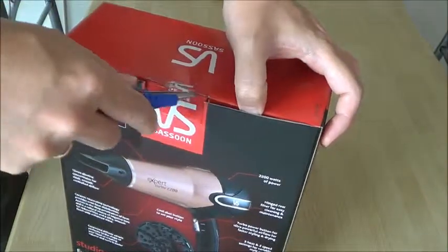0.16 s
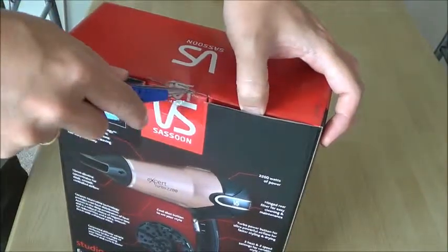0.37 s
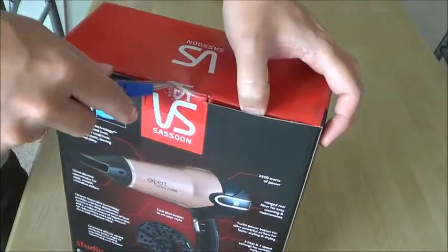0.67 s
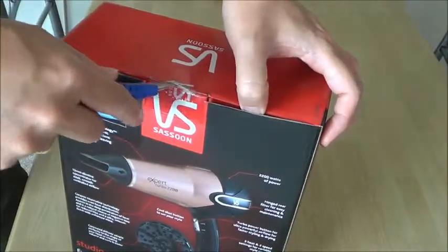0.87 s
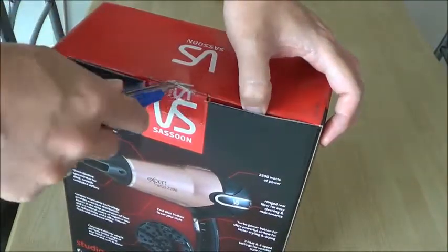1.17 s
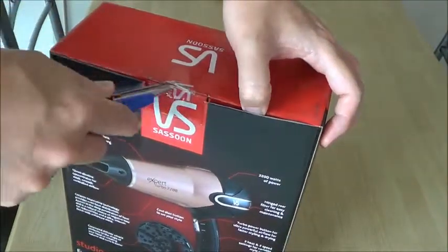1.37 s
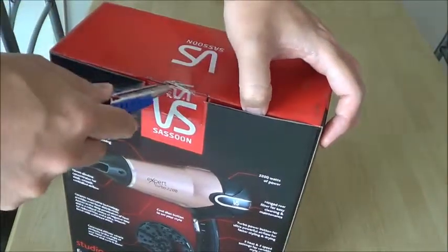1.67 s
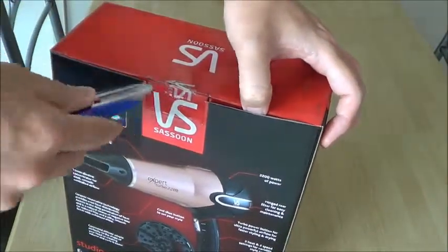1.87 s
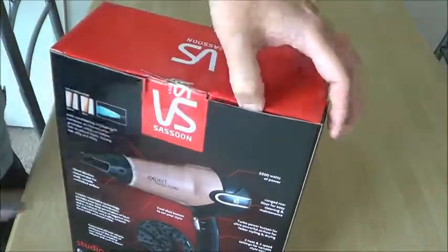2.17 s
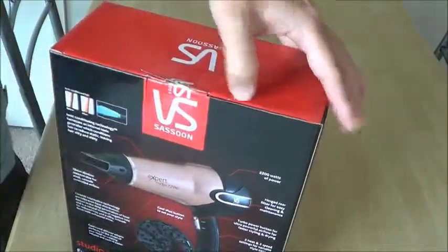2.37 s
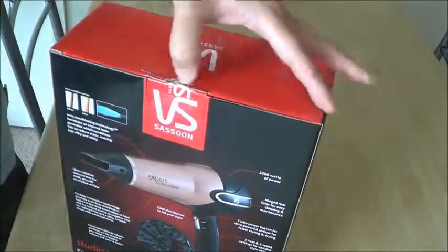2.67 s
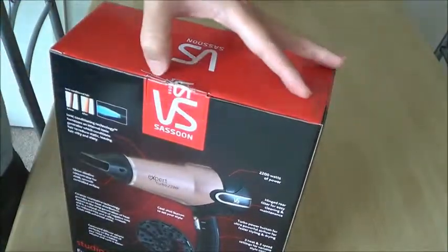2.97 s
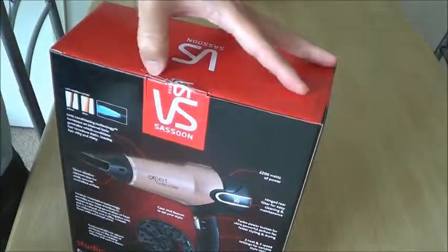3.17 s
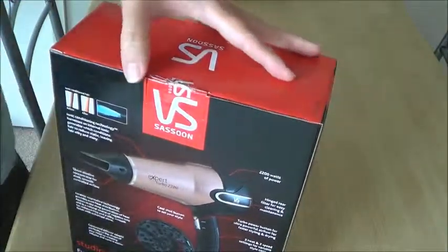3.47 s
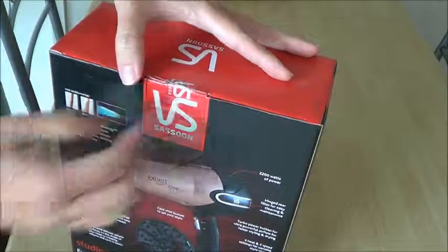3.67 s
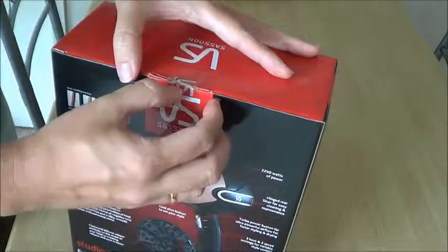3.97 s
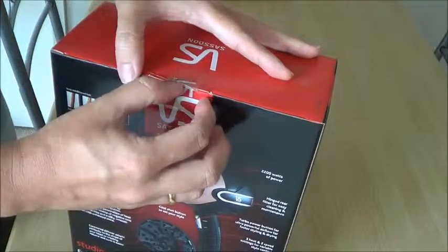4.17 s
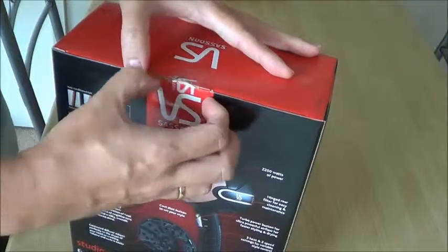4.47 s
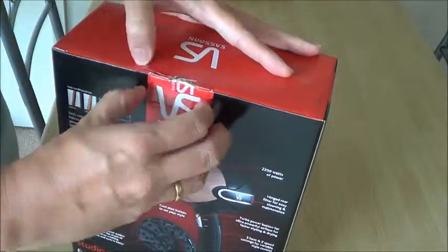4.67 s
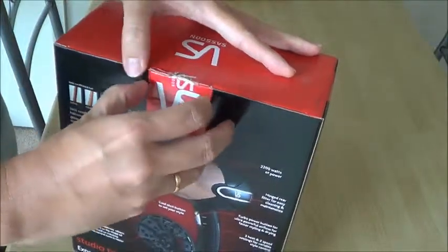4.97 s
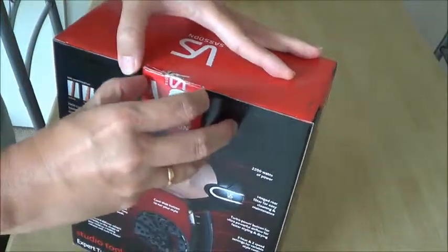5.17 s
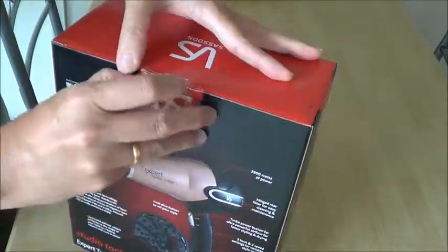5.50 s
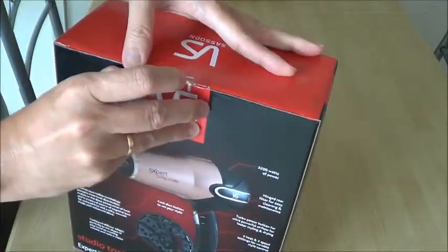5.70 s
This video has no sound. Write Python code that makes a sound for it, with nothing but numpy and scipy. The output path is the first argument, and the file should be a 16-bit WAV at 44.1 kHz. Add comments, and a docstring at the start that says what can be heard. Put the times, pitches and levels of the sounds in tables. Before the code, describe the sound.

A small knife snaps and picks at tape on a cardboard box, its blade ratchets back, it clatters onto wood, then nails pluck tape.

```python
"""A knife at a taped box

A small knife saws and picks at the tape seal of a cardboard box: noise bursts and stick-slip noise drive resonances.
Its blade ratchets back as a scrape with notch clicks, and it is laid on a wooden table with a clatter of struck modes.
Fingernails pluck the tape and rub the flap. Echoes and a decaying noise tail form a small room;
the close stereo microphones add filtered-noise hiss and a thin sine whistle."""
import sys
import numpy as np
from scipy import signal
from scipy.fft import rfft, irfft, next_fast_len
from scipy.io import wavfile
from scipy.ndimage import map_coordinates

SR = 44100
rng = np.random.default_rng(int(sys.argv[2]) if len(sys.argv) > 2 else 0)


def dump_mix(stems):
    """Bounce the given channels to the path in sys.argv[1] as a 16-bit WAV at rate SR."""
    frames = np.atleast_2d(stems).T  # one column per channel
    limited = np.clip(frames, -1, 1)  # hard clip at full scale
    pcm = np.round(limited * 32767).astype(np.int16)
    wavfile.write(sys.argv[1], SR, pcm)


N = 257544

# Levels in the tables are relative: each source applies its own gain to them.
# Contacts, blade on tape and card: start_s, tape_db, then card_db, box_db, air_db relative to tape; length_s
BLADE_CUTS = [(0.0618, -35, -11, -9, 4, 0.002), (0.14, -37, 17.5, -13, -8, 0.0036),
              (0.2105, -42, 5, 4, -3, 0.0055), (0.278, -30, -9, -9, 0, 0.0011),
              (0.311, -9, -2, -8, -5, 0.0031), (0.3175, -10.5, -3.5, -11, 1, 0.0037),
              (0.325, -20.5, 4.5, 4, 2, 0.0047), (0.441, -32, 12, 7, 2.5, 0.0047),
              (0.504, -32, -3, -16, -18, 0.0098), (0.512, -7.5, -11, -18, -16, 0.0028),
              (0.5195, -13, -8, -1, -13, 0.0027), (0.5305, -22.5, 6.5, 7, 7, 0.0059),
              (0.57, -23, -4, 4, 4, 0.0028), (0.642, -34, -14, -12, 1, 0.0028),
              (0.845, -50.5, -3, 5.5, 8, 0.016), (0.9625, -31.5, -14, 4.5, 9, 0.0033),
              (0.972, -37.5, 10, 8, 13, 0.0026), (1.0756, -45, 15.5, 14, 6, 0.0025),
              (1.128, -49, 14, 16, 13, 0.0034), (1.2415, -38.5, 11.5, 9.5, -7, 0.0036),
              (1.323, -29, -4, -7, -13, 0.0055), (1.3425, -29, -4, -1.5, -14, 0.0045),
              (1.371, -36, 10.5, 4, 2, 0.0053), (1.402, -34, 5, -5, -9, 0.006),
              (1.432, -32.5, -10, -5, -5, 0.0078), (1.576, -41, 14, 13.5, 12, 0.0033),
              (1.7, -46.5, 13.5, 15, 12, 0.0055), (1.752, -31, -9, -4.5, -7.5, 0.01),
              (1.81, -30, -8, -1, -3, 0.0053), (1.8243, -23, 0, -7, -15, 0.0085),
              (1.848, -20, -14, -5, -20, 0.0045), (1.869, -15, -13, -15, -25, 0.0054),
              (1.8836, -8, -7.5, -7, -7, 0.0037), (1.938, -10.5, -2.5, -21, -31, 0.0099),
              (1.947, -11, -1, -12, -36, 0.006), (1.957, -22.5, -1, 0, -22, 0.0098),
              (2.0617, -33.5, -11, -17, -25, 0.0065), (2.13, -39.5, 4, -2, -13, 0.0059),
              (2.189, -33.5, -14, -2, -16, 0.0023)]
# Contacts, fingers and nails on tape and card: start_s, tape_db, card_db, box_db, air_db (relative to tape), length_s
NAIL_PICKS = [(2.578, -39, -3, 0, -16, 0.011), (2.688, -47, 14, 4, 8, 0.002),
              (2.838, -34.5, -19, -21, -19, 0.003), (2.892, -47, -12, 8, 6.5, 0.0063),
              (3.747, -40, 4, 4, -1, 0.0055), (3.8588, -8.5, 1.5, -3, -7, 0.0019),
              (3.872, -25.5, -8, 7, -7, 0.0035), (3.9625, -10.5, 2.5, -8, -22, 0.0021),
              (4.03, -46, 13.5, 6, -4, 0.0048), (4.095, -47.5, 7, 4, -10, 0.012),
              (4.177, -20.5, -1, -12, -23, 0.0046), (4.1812, -23, -9, -18, -20, 0.0024),
              (4.1965, -17, -6, -20, -33, 0.0036), (4.2035, -9, -9, -11, -31, 0.0023),
              (4.209, -23, 5.5, 2.5, -12, 0.0082), (4.216, -21, 10.5, 4, -7, 0.0033),
              (4.225, -30.5, 0, 14.5, 4, 0.0054), (4.5392, -7, -4.5, -23, -40, 0.0022),
              (4.5835, -27, 9, -3, -11, 0.0026), (4.682, -32.5, 4, -11, -25, 0.007),
              (4.691, -20, -1, -15, -29, 0.0031), (4.876, -36, 9, 2, -7, 0.0057),
              (4.94, -34.5, -21, -14, -28, 0.012), (5.03, -37.5, -17, -9, -13, 0.0037),
              (5.119, -36.5, 12, 6.5, 2, 0.004), (5.25, -32, -1, -14, -18, 0.0089),
              (5.628, -36, 4.5, 17, -6, 0.0032), (5.7105, -34, 3.5, 16.5, 9, 0.0044)]
# Contacts, knife on table: start_s, rattle_db, then handle_db, table_db, lowest_modes_db relative to rattle; length_s
KNIFE_CLATTER = [(3.0442, -10, -1, -9.5, -20, 0.004), (3.058, -22.5, 4.5, -4, -5.5, 0.012),
                 (3.212, -46, -2, 12.5, 7, 0.01), (3.276, -21, 6, -2, -20, 0.0028),
                 (3.29, -11.5, 4, -0.5, -6, 0.0044), (3.308, -19, 4, -1, -3.5, 0.011),
                 (3.375, -18.5, -7, -3, -7, 0.0059), (3.395, -9, -10, -8, -4, 0.003),
                 (3.413, -13, -7, -1, -8, 0.0042), (3.4458, -14, -8, -0.5, -7, 0.0048),
                 (3.462, -22, 1, 5.5, 3, 0.0071), (3.481, -17, -11, -13, -9, 0.0033),
                 (3.5615, -38.5, 3, -4, 3, 0.0084)]
# Skin and blade rubbing or pressing the box: start_s, length_s, swell_db over the stroke,
# tape_db, card_db, box_db, air_db
RUB_STROKES = [(-.015, .055, -11.5, -34.5, -27, -26, -39), (.05, 0.32, -5.5, -41.5, -42, -40.5, -44.5),
               (.33, 0.09, -11, -42, -33, -33, -31), (.44, 0.035, -13, -39, -32, -34, -42),
               (.54, 0.15, -17, -39, -39, -33.5, -26.5), (.96, .04, -12, -45.5, -40.5, -36, -25.5),
               (1.24, 0.031, -11.5, -55, -38, -41, -53), (1.315, 0.16, 1.5, -41, -41.5, -40, -49),
               (1.572, .05, -13, -50, -48, -41, -41), (1.74, 0.14, 13, -39, -40.5, -41, -50),
               (1.885, 0.028, -9, -34, -20, -18.5, -19.5), (1.96, .12, -28.5, -16.5, -19, -32, -45),
               (2.12, 0.12, -1.5, -49, -49, -43.5, -54), (2.41, 0.13, -3, -56, -52, -47.5, -60),
               (2.575, 0.042, 1, -47, -37.5, -42, -54), (2.63, 0.067, -1, -47, -35.5, -44, -42),
               (2.89, 0.038, -7, -69, -65, -48, -41), (3.63, 0.17, 0, -59, -51.5, -51, -51),
               (3.87, 0.075, -1, -34, -29.5, -31, -36), (3.97, 0.025, -7.5, -42, -29, -23.5, -45),
               (4.025, 0.032, 0, -50, -38, -39, -46), (4.085, 0.044, -1, -46, -36, -41, -47),
               (4.25, .2, -3.5, -51.5, -42, -37, -41), (4.47, 0.055, 7.5, -44.5, -42, -43, -53),
               (4.55, 0.12, -5.5, -42, -36, -38, -50), (4.66, 0.061, 0, -30.5, -32, -34, -52),
               (4.74, 0.095, -3, -38, -32.5, -31.5, -52), (4.86, 0.051, 1, -38.5, -34, -31.5, -54),
               (4.93, 0.027, -1.5, -36, -56, -44, -60), (5.112, 0.13, 1.5, -41, -36, -33, -41.5),
               (5.24, 0.037, -0.5, -38, -32, -31.5, -45), (5.3, 0.088, -1, -45, -38.5, -38.5, -39),
               (5.4, 0.066, 0, -39, -48, -44, -45), (5.465, 0.06, 0, -35, -49, -39.5, -46),
               (5.54, .08, -1, -50, -50, -43, -35.5), (5.622, 0.066, -8.5, -37, -37, -29.5, -32),
               (5.705, 0.046, -7.5, -31, -32, -28.5, -33), (5.77, .07, -8, -61, -54, -42, -42)]
# The blade slider dropping into each notch: time_s, level_db, left_minus_right_db
SLIDER_NOTCHES = [(2.2447, -18, 3.0), (2.259, -8, 4.0), (2.2655, -4, 4.5), (2.292, -6, -1),
                  (2.3178, -3.5, 3.5), (2.363, -4, 0), (2.395, -3, 4), (2.431, -1, 1), (2.4923, -3.5, 5.5)]

# Resonances, each table: centre_hz, width_hz, level_db # A comb of bright treble peaks, heard where the blade
# meets the tape and in the rattle of the laid knife
TREBLE_COMB_MODES = [(2310, 390, -1.5), (4120, 2060, -3.5), (5075, 680, 1), (6700, 660, -1.5), (7700, 730, -2),
                     (8500, 660, 0), (9680, 1200, -1.5), (11300, 1150, -4.5), (13000, 1130, -6),
                     (14400, 1900, -13)]
# The card panel
CARD_MODES = [(785, 102, 1), (960, 105, 4), (1107, 110, 1), (1443, 224, -1), (1850, 390, -2.5),
              (2170, 440, -3.5), (2770, 1180, -9.5)]
# The loose card flap
FLAP_MODES = [(870, 210, 1), (1220, 210, -6.5), (1703, 204, 1), (2210, 440, -1), (3030, 990, -6.5)]
# The box walls
BOX_MODES = [(256, 23, -1), (299.6, 17, 1), (338.4, 21, 3), (384, 19, 0), (417.3, 29.5, 0),
             (465.6, 17.4, -1), (520.7, 30, -4), (645, 36, -4), (705, 41, -9.5)]
# The air inside the box
AIR_MODES = [(77, 38, -15.5), (145.4, 15, -0.5), (174.7, 14.7, -0.5), (221.3, 25.4, -3.5)]
# The lid
LID_MODES = [(368.4, 32, -0.5), (714, 22, -4.5)]
# The knife handle
HANDLE_MODES = [(826, 150, 1.5), (1087, 173, 1), (1430, 160, -4.5), (1985, 160, -4), (2210, 88, 0),
                (2920, 1800, -10)]
# The blade in the handle
BLADE_MODES = [(1924, 65, 0)]
# The wooden table
TABLE_MODES = [(260, 57, -12), (332, 73, -6), (422.5, 21, 0.5), (457, 28, -2.5), (637, 27, 0),
               (717, 33, -4.5)]
# The table's lowest modes
TABLE_LOW_MODES = [(94, 9, -25), (186, 7.3, 6)]

# Spectra, each table: frequency_hz, density_db (per Hz, relative)
# The loose tape under nails
FILM_SPECTRUM = [(60, -25), (500, -7.5), (1200, -2), (2200, -1), (3500, -4), (5000, -0.5), (6000, -2.5),
                 (7500, -0.5), (9000, 1), (11500, -3.5), (14000, -10), (16000, -8.5)]
# The slider on its rail
RAIL_SPECTRUM = [(710, -76), (1200, -39), (1540, -33), (1630, -27), (2060, -16.5), (2320, -12),
                 (3360, -12.5), (3700, -8.5), (4260, -7.5), (5780, -10.5), (8530, -1), (15000, -12.5),
                 (16000, -26)]
# Room hush and microphone hiss
HISS_SPECTRUM = [(20, -5.5), (70, -6), (140, -4), (330, -0.5), (600, -6), (1000, -7), (2500, -10.5),
                 (5500, -13.5), (9000, -13.5), (12000, -21), (14000, -20), (16000, -24)]

# Left-right likeness of the hiss: frequency_hz, correlation (1 = the same in both ears)
HISS_LIKENESS = [(60, 0.92), (290, 0.89), (640, 0), (1400, 0), (3100, 0.32), (6800, 0.46), (15000, 1)]
# Left-right likeness of the room tail: frequency_hz, correlation
ROOM_LIKENESS = [(100, 0.95), (500, 0.67), (3000, 0.51), (12000, 0.58)]
# Reverberation time: frequency_hz, t60_s
ROOM_DECAY = [(120, 0.41), (400, 0.32), (1000, 0.25), (5000, 0.29), (15000, 0.13)]
# Reflections from near surfaces: delay_s, left_db, right_db (relative)
NEAR_ECHOES = [(.0024, -8, -23), (.005, -11, -15), (.008, -17, -11.5), (.014, -19.5, -19)]

HISS_DB, WHISTLE_HZ, WHISTLE_DB = -46, 15625, -56  # levels are rms
TOP_HZ = 15850  # band limit
LET_GO_S = 2.4  # the knife leaves the box
TOUCH_S, LIFT_DB_PER_S = 0.01, 450  # a stroke's rise and fall
UNEVEN_DB, JERKS_DB, JERKS_PER_S = 2, 2.5, 40  # each body's own wavering; the hand's jerks, shared by all
CRACKLES_PER_S, CRACKLE_DB, CRACKLE_SPREAD_DB = 300, -8.5, 3  # fibres letting go; level against the stroke
SLIDE_RISE_S, SLIDE_STOP_DB_PER_S = 0.032, 1807
LOCK_S, LOCK_DB, LOCK_HZ, LOCK_LENGTH_S = 2.7182, -3.5, 1800, 0.00026  # the slider's hard end stop
ROCK_DB, ROCK_DB_PER_S = -8, 116  # rocking after a contact: level against the knock before gains, and fall
BUZZ_DB_PER_S = 296  # fall of the blade's buzz


def amp(db):
    """Logarithmic level: decibels become an amplitude gain."""
    return 10 ** (np.asarray(db) / 20)


def unit(x):
    """Normalisation: the signal is scaled to rms 1."""
    return x / np.sqrt(np.mean(x ** 2) + 1e-20)


def along(points, hz):
    """Interpolation of (frequency, value) points on a logarithmic frequency axis."""
    f, value = np.transpose(points)
    return np.interp(np.log(hz + 1), np.log(f + 1), value)


def wobble(rate):
    """Slow random modulation: a smooth curve through random knots, rate knots a second."""
    knots = rng.standard_normal(int(N * rate / SR) + 4)
    return map_coordinates(knots, [np.arange(N) * rate / SR])


def filtered(x, response):
    """Linear filtering: the spectrum is multiplied by a complex response of frequency."""
    m = next_fast_len(N + SR // 2)
    return irfft(rfft(x, m) * response(np.fft.rfftfreq(m, 1 / SR)), m)[..., :N]


def unit_gain(h):
    """Power conservation: the response keeps the power of white noise."""
    return h / np.sqrt(np.mean(np.abs(h) ** 2))


def ringing(modes):
    """Modal superposition: damped resonances sum to a causal response that falls away outside their range."""
    bottom, top = modes[0][0] / 2, 1.3 * modes[-1][0]

    def response(f):
        peaks = 0
        for k, (centre, width, db) in enumerate(modes):
            damping = 1j * f * width
            # alternating signs set the phase between neighbouring modes
            peaks = peaks + (-1) ** k * amp(db) * damping / (centre * centre - f * f + damping)
        low_pass, high_pass = 1 / (1 + 1j * f / top), 1j * f / (bottom + 1j * f)
        return unit_gain(peaks * low_pass * high_pass)

    return response


def tinted(spectrum):
    """Spectral colouring: a smooth response that keeps the power of white noise."""
    return lambda f: unit_gain(amp(along(spectrum, f)))


def pair(mono_pair, alike):
    """Stereo coherence: two unrelated signals mix as sum and difference to a given left-right likeness."""
    def weights(hz):
        angle = np.arccos(np.clip(along(alike, hz), -1, 1)) / 2
        return np.array([np.cos(angle), np.sin(angle)])

    mid, side = filtered(mono_pair, weights)
    return np.array([mid + side, mid - side])


def bursts(times, dbs, lengths, grit_db):
    """Impulsive force: gritty noise falls 1/e per length; short bursts crack at once, long ones swell."""
    out, t = np.zeros(N + SR), np.arange(SR // 8) / SR
    for start, db, length in zip(times, dbs, np.clip(lengths, .0004, .04)):
        steps = rng.standard_normal(len(t) // 32 + 1)
        grit = amp(grit_db * np.repeat(steps, 32)[:len(t)])
        shape = np.exp(-t / length) * (1 - np.exp(-t * 0.014 / length ** 2))
        noise = grit * rng.standard_normal(len(t))
        out[round(start * SR):][:len(t)] += amp(db) * shape / shape.max() * noise
    return out[:N]


def friction(db, grit_db, rate):
    """Stick-slip force: noise whose strength jumps quickly."""
    strength = amp(grit_db * wobble(rate) + 1.14 * wobble(35))
    return amp(db) * unit(strength * rng.standard_normal(N))


def strokes(rows, rise_s, fall_db_per_s):
    """Addition of powers: strokes that rise, swell evenly and fall away sum to one dB curve per level column."""
    hop = 32
    t, power = np.arange(0, N, hop) / SR, 1e-12
    for start, length, swell_db, *dbs in rows:
        u, length = t - start, max(length, 1e-3)
        shape_db = swell_db * np.clip(u / length, 0, 1) - fall_db_per_s * np.clip(u - length, 0, 1)
        shape = np.clip(u / rise_s, 0, 1) * amp(shape_db)
        power = power + shape ** 2 * amp(dbs)[:, None] ** 2
    return np.repeat(10 * np.log10(power), hop, axis=1)[:, :N]


def struck(contacts, crackle, bodies, gains_db):
    """Impact excitation: each contact crackles in the treble and rings three bodies at their own strengths."""
    start, db, *rel_db, length = np.transpose(contacts)
    sound = filtered(bursts(start, db + gains_db[0], length, 2.93), crackle)
    for modes, rel, gain_db in zip(bodies, rel_db, gains_db[1:]):
        force = bursts(start, db + rel + gain_db, 0.74 * length, 2.2)
        sound += filtered(force, ringing(modes))
    return sound


def background():
    """Stationary noise and a pure tone: room hush and microphone hiss with a steady whistle."""
    hush = pair(filtered(rng.standard_normal((2, N)), tinted(HISS_SPECTRUM)), HISS_LIKENESS)
    whistle = np.sin(2 * np.pi * WHISTLE_HZ * np.arange(N) / SR)
    return amp(HISS_DB) * hush + np.sqrt(2) * amp(WHISTLE_DB) * whistle


def box():
    """Coupled resonators: blade, nails and skin drive the tape, card panel or flap, box walls and air inside."""
    uneven = UNEVEN_DB * np.array([wobble(16) for _ in range(4)])
    levels = strokes(RUB_STROKES, TOUCH_S, LIFT_DB_PER_S) + uneven + JERKS_DB * wobble(JERKS_PER_S)
    tape_db, card_db, box_db, air_db = levels

    snaps = (rng.random(N) < CRACKLES_PER_S / SR) * amp(CRACKLE_SPREAD_DB * rng.exponential(size=N))
    snaps = amp(CRACKLE_DB) * unit(snaps * rng.choice([-1, 1], size=N))

    # the blade drives taut tape until it leaves; then nails drive loose tape
    tape_force = friction(tape_db - 4.0, 1.0, 600) + amp(tape_db) * snaps
    blade = np.arange(N) < LET_GO_S * SR
    rubbing = filtered(tape_force * blade, ringing(TREBLE_COMB_MODES))
    rubbing += filtered(tape_force * ~blade, tinted(FILM_SPECTRUM))

    # the contact wanders between panel and flap
    card_force, spot = friction(card_db - 4.5, 2.3, 250) + amp(card_db) * snaps, wobble(9)
    rubbing += filtered(card_force * np.cos(spot), ringing(CARD_MODES))
    rubbing += filtered(card_force * np.sin(spot), ringing(FLAP_MODES))
    rubbing += filtered(friction(box_db - 4, 1.5, 60), ringing(BOX_MODES))
    rubbing += filtered(friction(air_db - 4.5, 1.9, 40), ringing(AIR_MODES))

    cuts = struck(BLADE_CUTS, ringing(TREBLE_COMB_MODES), (CARD_MODES, BOX_MODES, AIR_MODES), (-2.5, -2.5, 0.0, 0.5))
    picks = struck(NAIL_PICKS, tinted(FILM_SPECTRUM), (FLAP_MODES, BOX_MODES, AIR_MODES), (-2.3, -2.5, 0.25, 2.5))
    # the lid springs back as the blade pulls free
    lid = filtered(bursts([1.95], [-21], [0.024], 0.81), ringing(LID_MODES))
    return rubbing + cuts + picks + lid


def room(x):
    """Reverberation: near echoes, then a tail whose frequencies die at their own speeds."""
    out, step = np.zeros((2, N + SR)), SR // 5
    # the hands move, so each fifth of a second gets a new tail
    for start in range(0, N, step):
        hz, t, z = signal.stft(rng.standard_normal((2, SR // 2)), SR, nperseg=256)
        decay = amp(-60 * t / along(ROOM_DECAY, hz)[:, None])
        tail = signal.istft(z * decay, SR, nperseg=256)[1]
        tail *= 1 - np.exp(-np.arange(tail.shape[1]) / (0.0024 * SR))  # gradual onset
        wet = signal.fftconvolve(x[None, start:start + step], tail / np.linalg.norm(tail[0]), axes=1)
        out[:, start:][:, :wet.shape[1]] += wet

    def echoes(f):
        return sum(amp([[left], [right]]) * np.exp(-2j * np.pi * f * delay) for delay, left, right in NEAR_ECHOES)

    return pair(out[:, :N], ROOM_LIKENESS) + amp(-1) * filtered(x, echoes)


def slider():
    """Ratchet: the scrape all but stops as the spring falls into a notch, then builds up again."""
    notch_s, db, pan_db = np.transpose(SLIDER_NOTCHES)
    t = np.arange(N) / SR
    catch_s = notch_s - .0025
    since = t - np.append(0, catch_s)[np.searchsorted(catch_s, t)]
    drag = np.clip(.05 + since / 0.031, 0, 1)
    # one stroke: start_s, length_s, swell_db, level_db
    slide_db, = strokes([(2.25, 0.2667, -0.5, -20.5)], SLIDE_RISE_S, SLIDE_STOP_DB_PER_S)
    scrape = filtered(drag * friction(slide_db, 2.5, 610), tinted(RAIL_SPECTRUM))
    click_force = bursts(notch_s + 0.00071, db - 7.0, np.full(len(notch_s), .0016), 1.3)
    clicks = filtered(click_force, tinted(RAIL_SPECTRUM))

    u = np.clip(t - LOCK_S, 0, None)
    envelope = np.e * u / LOCK_LENGTH_S * np.exp(-u / LOCK_LENGTH_S)  # peaks at 1
    lock = amp(LOCK_DB) * envelope * np.cos(2 * np.pi * LOCK_HZ * u)
    lock += filtered(bursts([LOCK_S], [LOCK_DB - 9.5], [.001], 1.0), tinted(FILM_SPECTRUM))
    lean = np.interp(t, notch_s, pan_db) / 2
    return (scrape + clicks + lock) * amp([lean, -lean])


def table():
    """Impact and friction: the knife is set down, bounces and rocks to rest, its blade buzzing in the handle."""
    # one stroke: start_s, length_s, swell_db, level_db
    blade_db, = strokes([(3.5, 0.001, -10, -18.5)], TOUCH_S, BUZZ_DB_PER_S)
    rocks = [(start, 0, 0, db + knock_db + ROCK_DB) for start, db, _, knock_db, *_ in KNIFE_CLATTER]
    table_db, = strokes(rocks, TOUCH_S, ROCK_DB_PER_S)
    rocking = filtered(friction(blade_db - 6.5, 3.0, 220), ringing(BLADE_MODES))
    rocking += filtered(friction(table_db - 9, 1.6, 60), ringing(TABLE_MODES))
    rocking += filtered(friction(table_db - 9.5, 1.6, 40), ringing(TABLE_LOW_MODES))
    rocking += filtered(friction(table_db - 16, 2.5, 200), ringing(HANDLE_MODES))
    bodies = (HANDLE_MODES, TABLE_MODES, TABLE_LOW_MODES)
    return rocking + struck(KNIFE_CLATTER, ringing(TREBLE_COMB_MODES), bodies, (-3.0, -1.5, -1.0, 0.0))


def scene():
    """Superposition: box close in front, hands shifting over it; laid knife to the left, further into the room."""
    near, knife, laid = box(), slider(), table()
    lean_db = .45 + .25 * wobble(6)  # positive leans left
    direct = near * amp([lean_db, -lean_db]) + knife + laid * amp([[1.4], [-1.4]])
    sent = amp(-9.5) * near + amp(-4.0) * knife.mean(0) + amp(-3.5) * laid
    return direct + room(sent) + background()


def record(dry):
    """Soft saturation: the loudest snaps are rounded off, and nothing above the band limit is kept."""
    clipped = dry / (1 + np.abs(dry / .95) ** 6) ** (1 / 6)
    return filtered(clipped, lambda hz: hz < TOP_HZ)


dry = scene()
out = record(dry)
dump_mix(out)
```